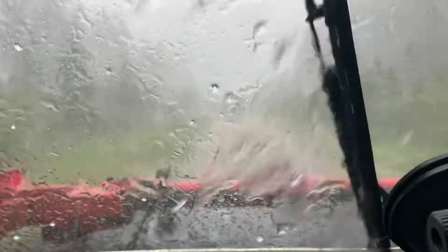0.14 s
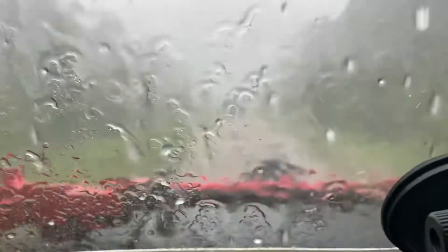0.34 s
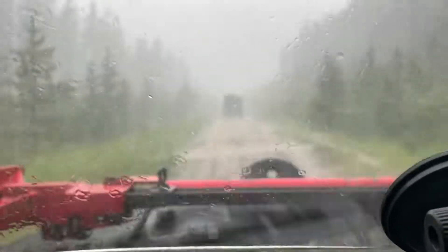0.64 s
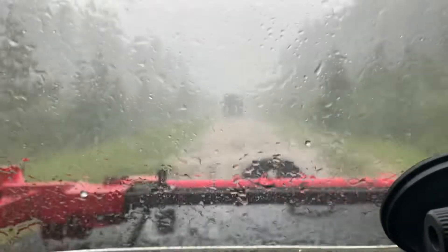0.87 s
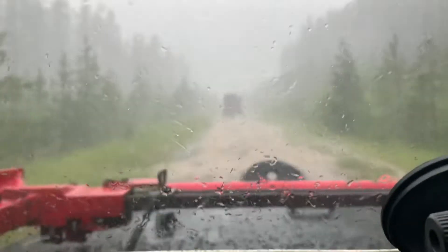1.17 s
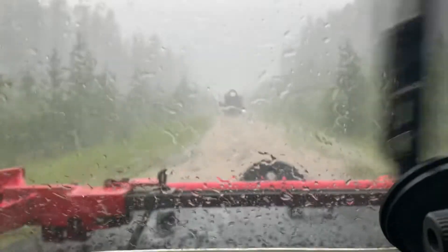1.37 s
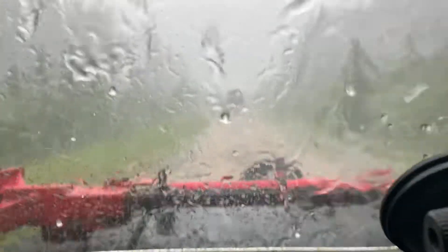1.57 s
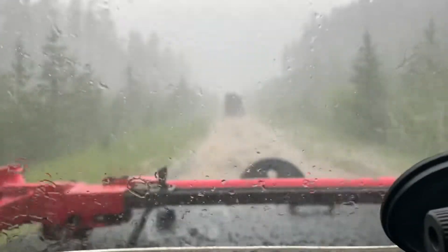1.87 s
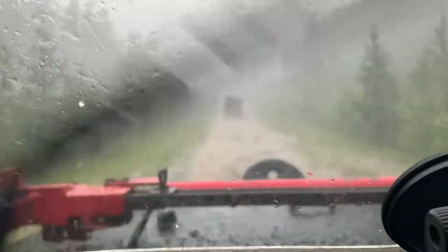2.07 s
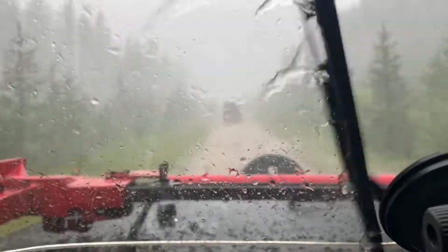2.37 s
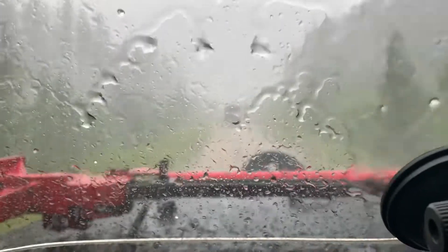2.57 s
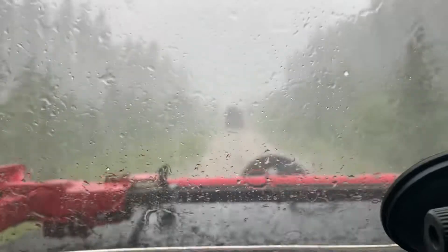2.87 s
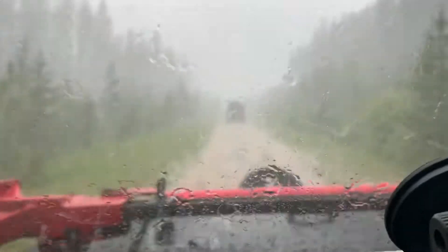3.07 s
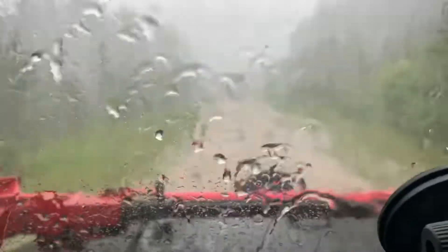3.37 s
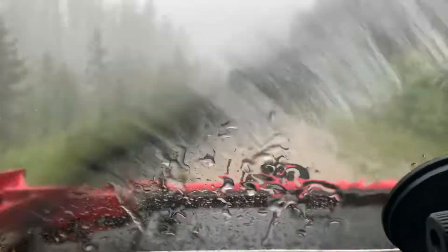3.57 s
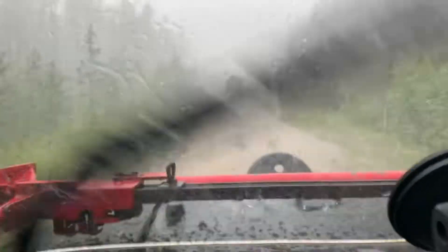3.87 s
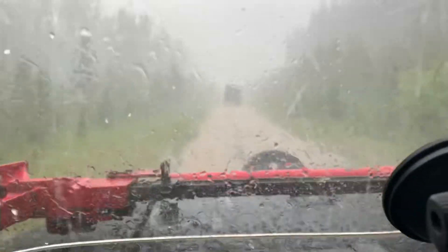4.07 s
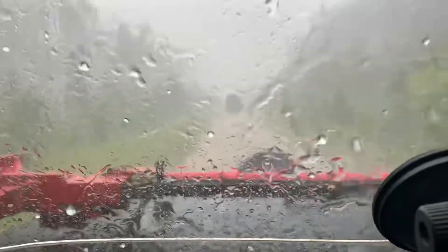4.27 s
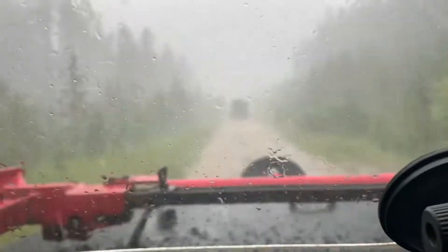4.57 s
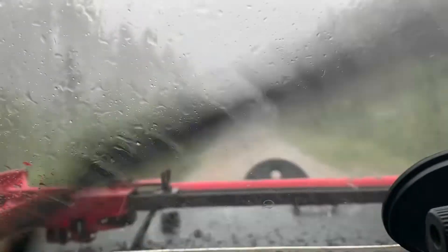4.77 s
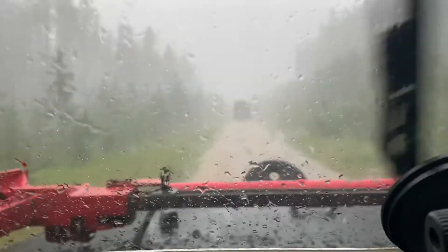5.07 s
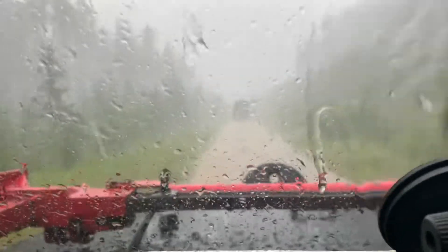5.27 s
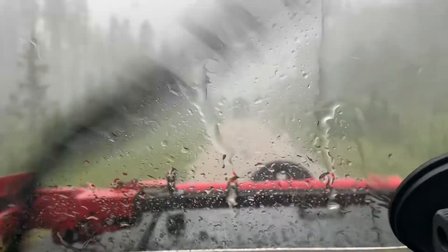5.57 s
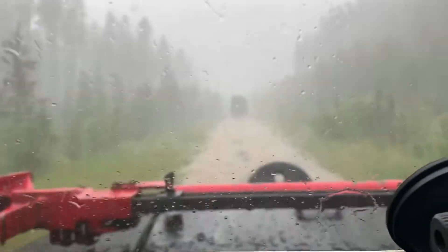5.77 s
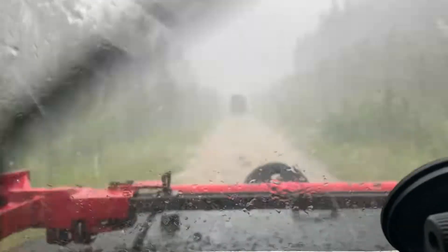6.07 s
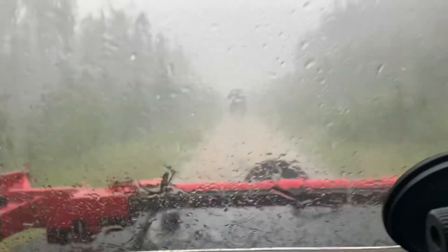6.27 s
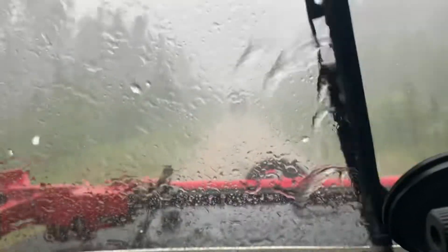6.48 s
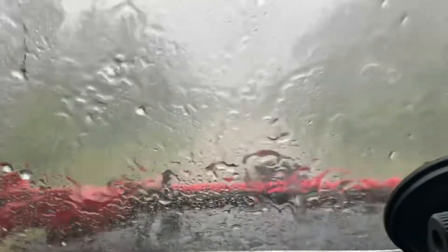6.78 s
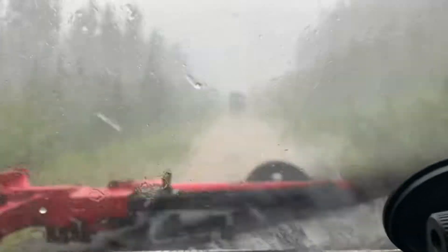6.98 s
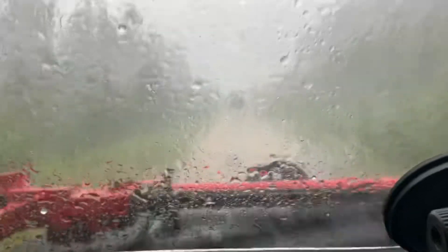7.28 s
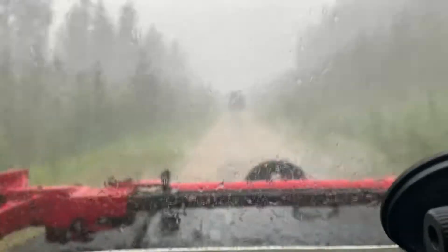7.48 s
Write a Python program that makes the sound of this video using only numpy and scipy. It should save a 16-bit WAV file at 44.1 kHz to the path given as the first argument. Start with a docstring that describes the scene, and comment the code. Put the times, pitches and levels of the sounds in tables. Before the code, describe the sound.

Heavy rain hits a moving vehicle throughout, heard from inside the cab close to the windshield. Dense, crisp patter and hissing spray swell and ease in sheets, with fat drops smacking the glass and a duller drumming on the metal roof. The rain surges at the start, around 1.5, 2.6 and 3.8 seconds, dips briefly near 3.3 and 5.2, and is strongest around 6.6 and 7.5. Slugs of water thud hollowly on the roof at the start, around 4 seconds and at the end. A wiper gives a hollow double knock at about 3.2 and 5.2 seconds. Underneath, a low engine drone wavers, rises in pitch from about 4 to 5.5 seconds and drops again at the very end. The rough dirt road adds a constant rumble and deep booming bumps, which come thicker and heavier from 6 seconds on.

```python
"""Heavy rain inside a vehicle on a dirt trail.

Sheets of drops surge against the windshield and drum on the roof, their impacts exciting the panels'
resonances. Fat single drops smack in between, and the wiper knocks. Underneath, the engine drones at
its firing rate and rough ground sets the air of the cab booming. The listener is a phone with two
microphone ports, close to the glass."""
import sys
import numpy as np
from scipy import signal
from scipy.fft import rfft, irfft, next_fast_len
from scipy.io import wavfile
from scipy.ndimage import uniform_filter1d

SR = 44100
rng = np.random.default_rng(int(sys.argv[2]) if len(sys.argv) > 2 else 0)


def transcribe(signal):
    """Save signal, clipped to [-1, 1], as a 16-bit WAV file at the path in sys.argv[1]."""
    frames = np.atleast_2d(signal).T
    limited = np.clip(frames, -1, 1)
    pcm = np.round(limited * 32767).astype(np.int16)
    wavfile.write(sys.argv[1], SR, pcm)


N = 336483
TIME = np.arange(N) / SR
MEDIUM_RAIN_DB, LOW_REVS_HZ = -30, 60  # reference rain level and firing rate

# The engine's speed. Each row: time in seconds, firing rate in Hz.
FIRING_RATE = [(0, 72.4), (.33, 75.7), (.58, 62.04), (1.2, 62.14), (1.55, 65.93), (2.02, 76.6), (2.3, 64),
               (2.9, 64.14), (3.4, 60.83), (3.9, 65.4), (4.3, 70.3), (4.7, 79.1), (5.05, 81), (5.42, 96.3),
               (6.2, 94), (6.75, 89.7), (7.3, 86.56), (7.63, 70.2)]
# Resonances of the windshield. Each row: centre in Hz, width in Hz, lift in dB.
GLASS_MODES = [(770, 110, 6.5), (1370, 150, 1.5), (1620, 120, 1.5), (2270, 110, 1.5), (2560, 260, 2.5),
               (3170, 150, 1.5), (3500, 230, 3), (4600, 300, 1.5)]


def undb(db):
    """Amplitude ratio of a level in decibels."""
    return 10 ** (np.asarray(db) / 20)


def unit(x):
    """Normalisation to an rms of 1."""
    return x / np.sqrt(np.mean(x ** 2))


def curves(table):
    """Linear interpolation of each column over the times in the first."""
    s, *columns = np.transpose(table)
    return [np.interp(TIME, s, column) for column in columns]


def wander(per_s):
    """Slow random modulation with a spread near 1."""
    steps = rng.standard_normal(int(TIME[-1] * per_s) + 2)
    return np.interp(TIME * per_s, np.arange(len(steps)), steps)


def add(out, s, sound):
    """Superposition of a sound starting at s seconds."""
    start = max(int(s * SR), 0)
    out[:, start:start + sound.shape[1]] += sound[:, :N - start]


def swells(rows, floor_db, steepness=1):
    """Power sum of swells and a floor, in dB; one rise or fall from its crest costs 10 * steepness dB."""
    power = undb(floor_db) ** 2
    t = TIME[::64]
    for crest_s, rise_s, fall_s, db in rows:
        away = np.maximum((crest_s - t) / rise_s, (t - crest_s) / fall_s)
        power = power + undb(db - 10 * steepness * away ** 1.71) ** 2  # nearly a bell curve
    return np.interp(TIME, t, 10 * np.log10(power))


def colour(x, outline, modes=()):
    """Minimum-phase filter of a spectral outline plus resonances; causality keeps attacks sharp."""
    size = 2048
    hz = np.fft.rfftfreq(size, 1 / SR)
    outline_hz, outline_db = np.transpose(outline)
    db = np.interp(np.log(hz + 1), np.log(outline_hz), outline_db)
    for centre, width, lift in modes:
        db = db + lift / (1 + (2 * (hz - centre) / width) ** 2)
    cepstrum = irfft(np.log(undb(db)))
    cepstrum[1:size // 2] *= 2
    cepstrum[size // 2 + 1:] = 0
    response = irfft(np.exp(rfft(cepstrum)))
    return signal.fftconvolve(x, response[None], axes=1)[:, :x.shape[1]]


def decay(splat_t60, ring_t60, ring_db):
    """Double exponential decay: a short splat, then the ring of panel and cab (t60 in seconds)."""
    t = np.arange(SR // 8) / SR
    splat = np.exp(-np.log(1000) * t / splat_t60)
    ring = undb(ring_db) * np.exp(-np.log(1000) * t / ring_t60)
    return np.hypot(splat, ring)


def impact(splat_t60, ring_t60, ring_db):
    """Broadband excitation by one blow: two channels of decaying noise."""
    fade = decay(splat_t60, ring_t60, ring_db)
    return fade * rng.standard_normal((2, len(fade)))


def shower(per_s, fade, spread_db, patchy_db, low_hz, high_hz, bands):
    """Shot noise of even mean power: random drops each excite a panel's bands in their own mix."""
    step = 8  # samples per envelope point
    size, rate = next_fast_len(N, True), per_s[::step]
    falls = rng.random(len(rate)) < rate * step / SR
    drop_db = spread_db * np.clip(rng.standard_normal(len(rate)), -2, 2)
    noise = rfft(rng.standard_normal((2, size)))
    band_of = np.searchsorted(np.geomspace(low_hz, high_hz, bands - 1), np.fft.rfftfreq(size, 1 / SR))
    out = 0
    for band in range(bands):
        band_db = drop_db + patchy_db * np.clip(rng.standard_normal(len(rate)), -2, 2)
        # overlapping splats add in power, and their fine detail is noise
        power = np.convolve(falls * undb(band_db) ** 2 / rate, fade[::step] ** 2)
        carrier = irfft(noise * (band_of == band), size)[:, :N]
        out = out + np.repeat(np.sqrt(power), step)[:N] * carrier
    return unit(out)


def engine():
    """Periodic firing gives a drone of three harmonics, which throbs and grows louder with the revs."""
    firing_hz, = curves(FIRING_RATE)
    phase = 2 * np.pi * np.cumsum(firing_hz * (1 + 0.01113 * wander(12))) / SR
    harmonics = np.sin(phase) + undb(-10.5) * np.sin(2 * phase) + undb(-13) * np.sin(3 * phase)
    throb = undb(3 * wander(11))
    level_db = -37 + 4 * np.log2(firing_hz / LOW_REVS_HZ)
    return unit(harmonics * throb) * undb(level_db)


def rough_ground():
    """Cavity resonance: rolling drives a rumble in the cab's air, and each bump adds a tonal boom."""
    # Bumps in the trail. Each row: crest in seconds, level in dB, boom in Hz, rise and fall in seconds.
    bumps = [(.45, -24, 53.6, .02), (.73, -25, 53.5, 0.058), (.86, -21, 52.4, 0.021),
             (1.245, -20, 54.5, .03), (2.0, -25, 62.5, 0.033), (2.261, -22, 50, 0.037),
             (2.63, -19.5, 48.9, .045), (2.99, -23, 50.3, 0.054), (3.42, -29, 51.57, 0.02),
             (3.86, -19.5, 40.3, 0.04), (4.35, -22, 47.8, .025), (5.05, -25, 56.3, 0.041),
             (5.29, -28, 51.87, 0.034), (5.44, -23, 49.7, .04), (5.97, -18.5, 52.2, 0.028),
             (6.2, -20, 56.6, 0.04), (6.322, -22, 54.8, .03), (6.45, -17, 54.2, .04),
             (6.62, -20, 61.4, 0.024), (6.79, -13.5, 50.2, 0.022), (6.92, -22, 42.9, 0.052),
             (7.14, -19, 50, 0.031), (7.24, -19.5, 55.85, 0.017), (7.32, -22, 60, 0.028),
             (7.46, -19, 57, 0.022), (7.529, -19, 55, 0.033)]
    # Spectrum of the cab's rumble. Each row: frequency in Hz, relative level in dB.
    cab_spectrum = [(12, -16.5), (25, -4), (38, 0.5), (50, -0.5), (64, 2.5), (85, -4.5), (120, -7.5),
                    (170, -18), (300, -20), (800, -29), (3000, -56)]
    # Air modes of the cab. Each row: centre in Hz, width in Hz, lift in dB.
    air_modes = [(46.1, 9.4, 5), (60.7, 5.1, 4.5), (111, 11, 2.5)]
    bump_db = swells([(s, length, length, db) for s, db, _, length in bumps], floor_db=-60)
    _, boom_hz, _ = curves(bumps)
    phase = 2 * np.pi * np.cumsum(boom_hz * (1 + 0.041 * wander(25))) / SR
    boom = unit(np.sin(phase)) * undb(bump_db)
    firing_hz, = curves(FIRING_RATE)
    roll_db = -29.5 + 3.5 * np.log2(firing_hz / LOW_REVS_HZ)
    rumble = colour(rng.standard_normal((2, N)), cab_spectrum, air_modes)
    # the close air modes beat quickly; the slow swells follow the ride alone
    rumble = rumble / np.sqrt(uniform_filter1d(rumble ** 2, size=SR // 5, axis=1))
    return rumble * np.hypot(undb(roll_db), undb(bump_db - 17.5)), boom


def body_panel(mode_hz=113.2, width_hz=9.5):
    """Forced vibration: the shaking of the ride wakes one low mode of the body now and then."""
    # Swells of the hum. Each row: crest, rise and fall in seconds, level in dB.
    hums = [(.2, 0.04, 0.07, -29), (2.8, 0.077, 0.19, -33.5), (3.85, 0.028, 0.24, -31),
            (4.19, 0.049, 0.093, -26), (4.42, 0.071, 0.068, -25.5), (5.33, 0.047, 0.051, -32),
            (6.0, 0.078, .2, -44)]
    resonator = signal.iirpeak(mode_hz, mode_hz / width_hz, fs=SR)
    ringing = signal.lfilter(*resonator, rng.standard_normal((2, N)))
    return unit(ringing) * undb(swells(hums, floor_db=-59))


def bonnet():
    """Steady shot noise from rain on the far bodywork, soft and round, coloured by the glass modes."""
    # Spectrum of the far patter. Each row: frequency in Hz, relative level in dB.
    spectrum = [(300, -10), (800, 0.5), (1400, 4), (2500, -2), (4000, -9), (7000, -32), (15500, -30)]
    tap = decay(splat_t60=.016, ring_t60=.08, ring_db=-4)
    patter = shower(np.full(N, 450.), tap, spread_db=4.5, patchy_db=4, low_hz=900, high_hz=4500, bands=6)
    return unit(colour(patter, spectrum, GLASS_MODES)) * undb(-49)


def wiper():
    """Structure-borne sound: the turning wiper knocks hollowly through the windshield."""
    # Knocks of the wiper. Each row: start in seconds, peak level in dB, ring in Hz.
    knocks = [(3.226, -16, 816), (3.284, -24, 400), (5.204, -14.5, 392), (5.261, -22.5, 563)]
    out = np.zeros((2, N))
    for s, peak_db, ring_hz in knocks:
        blow = impact(splat_t60=.04, ring_t60=.14, ring_db=-6)
        knock = colour(blow, [(80, 16), (260, 3.0), (800, 9.5), (2500, -45)], [(ring_hz, 130, 5)])
        add(out, s, knock * undb(peak_db) / np.abs(knock).max())
    return out


def rainfall(roof_lag_s=0.02):
    """Amplitude modulation by sheets of rain: spray keeps to the crests, the roof follows gently."""
    # Sheets of rain. Each row: crest, rise and fall in seconds, level of the drops in dB,
    # spray relative to the drops in dB, extra level on the roof in dB.
    sheets = [(.17, 0.74, 0.42, -24.5, -0.5, -0.5), (.57, 0.18, 0.19, -29, -3, -1),
              (1.091, 0.085, 0.36, -27.5, -4.5, 0), (1.181, 0.077, 0.076, -27.5, 2, 0),
              (1.478, 0.21, 0.2, -21.5, .5, 1.5), (1.749, 0.1, 0.41, -29, -4.5, -1.5),
              (2.24, 0.022, 0.095, -28.5, -5.5, 0), (2.631, 0.34, 0.5, -24.5, -1.5, 0),
              (3.4, 0.082, 0.32, -46.5, 5, 2), (3.82, 0.16, 0.51, -23.5, 0, 2.5),
              (4.031, 0.2, 0.14, -27, 2, -0.5), (4.571, 0.24, 0.041, -27.5, 1.5, 0.5),
              (4.68, 0.14, 0.2, -28, -0.5, 1.5), (5.441, 0.063, 0.18, -33.5, -1.5, 3.5),
              (5.819, 0.19, 0.4, -26, 0.5, 1.5), (6.14, 0.06, 0.23, -27.5, 0.5, 2),
              (6.4, 0.087, 0.12, -36.5, -16, 0.5), (6.535, 0.053, 0.3, -21.5, -7, 0.5),
              (6.771, 0.15, 0.23, -20.5, -4, 0), (7.075, 0.087, 0.35, -31, -8, -3),
              (7.555, 0.062, 0.18, -17.5, -2.5, 1)]
    crest_s, rise_s, fall_s, db, spray_share_db, roof_extra_db = np.transpose(sheets)
    drops_db = swells(zip(crest_s, rise_s, fall_s, db), floor_db=-47)
    spray_db = swells(zip(crest_s, rise_s, fall_s, db + spray_share_db), floor_db=-52, steepness=1.43)
    late_surge_db = np.interp(TIME - roof_lag_s, TIME, drops_db) - MEDIUM_RAIN_DB
    roof_db = -32 + 0.74 * late_surge_db + np.interp(TIME, crest_s, roof_extra_db)
    return drops_db, spray_db, roof_db


def roof(level_db):
    """Plate vibration: rain drums on the sheet metal, duller and longer than on glass."""
    # Spectrum of the drumming. Each row: frequency in Hz, relative level in dB.
    spectrum = [(50, -23), (120, 7), (170, -0.5), (215, -2), (260, 1), (390, 0.5), (480, -4.5), (620, -10),
                (1000, -9), (3000, -43)]
    # Resonances of the roof. Each row: centre in Hz, width in Hz, lift in dB.
    modes = [(185, 9.8, 5.5), (256.4, 14.5, 2.5), (397, 180, 0.5), (550, 31, 7.5)]
    tap = decay(splat_t60=0.022, ring_t60=0.13, ring_db=8)
    drum = shower(np.full(N, 500.), tap, spread_db=2.5, patchy_db=6.5, low_hz=176, high_hz=469, bands=4)
    return unit(colour(drum, spectrum, modes)) * undb(level_db)


def roof_thuds():
    """Impulsive loading: slugs of gathered water excite a low, hollow resonance of the roof."""
    # Slugs of water. Each row: start in seconds, peak level in dB, ring in Hz.
    slugs = [(.043, -15, 231), (.21, -14, 400), (2.33, -20, 350), (3.955, -12.5, 290), (4.199, -18, 190),
             (4.356, -16.5, 304), (7.563, -14, 340)]
    out = np.zeros((2, N))
    for s, peak_db, ring_hz in slugs:
        blow = impact(splat_t60=.04, ring_t60=.14, ring_db=-3)
        thud = colour(blow, [(60, -20), (170, 0), (450, 0), (2000, -35)], [(ring_hz, 110, 10)])
        add(out, s, thud * undb(peak_db) / np.abs(thud).max())
    return out


def pitch_hz(draw, low_hz=500, high_hz=5200):
    """Power-law mapping of a draw from 0 to 1 onto frequency; low pitches are more common."""
    return low_hz + (high_hz - low_hz) * draw ** 1.5


def pings(drops_db, per_s=130, tones=3, t60=.035, spread_db=2.5):
    """Damped sinusoids: faint, short pings, three tones at once, scattered and louder in the surges."""
    out = np.zeros((2, N))
    t = np.arange(SR // 20) / SR
    fade = np.exp(-np.log(1000) * t / t60)
    for when, strength, *draws in rng.random((int(per_s * N / SR), 2 + 3 * tones)):
        draws = np.reshape(draws, (3, tones, 1))
        tone_hz, channel_phases = pitch_hz(draws[0]), draws[1:]
        ping = np.sin(2 * np.pi * (tone_hz * t + channel_phases)).sum(axis=1)
        level_db = drops_db[int(when * N)] - 9.5 + spread_db * np.sqrt(12) * (strength - .5)
        add(out, when * N / SR, ping * fade * undb(level_db))
    return out


def fat_drop(smack_db, splash_db, t60, ring_hz, lift_db):
    """Impact of one large drop: a smack that excites the struck spot's resonance, and a bright splash."""
    # Spectra of the smack and the splash. Each row: frequency in Hz, relative level in dB.
    smack_spectrum = [(60, -34), (250, -15), (700, -5), (1500, 0), (2600, 1), (5000, 0), (7000, -10),
                      (15500, -28)]
    splash_spectrum = [(2000, -28), (5000, -8), (7000, 0), (11500, 1), (13500, -2), (15500, -3),
                       (17000, -30)]
    out, attack = 0, int(.0043 * SR)  # the levels apply to the attack
    struck_modes = GLASS_MODES + [(ring_hz, ring_hz / 5, lift_db)]  # the spot has a Q of 5
    for spectrum, modes, db in (smack_spectrum, struck_modes, smack_db), (splash_spectrum, (), splash_db):
        sound = colour(impact(splat_t60=.011, ring_t60=t60, ring_db=-5.5), spectrum, modes)
        out = out + sound * undb(db) / sound[:, :attack].std()
    return out


def fat_drops(drops_db, spray_db, per_s=50, range_db=14):
    """Discrete impacts: the fattest drops stand alone; lesser ones fall at random and follow the surges."""
    # The fattest drops. Each row: start in seconds, smack level in dB, splash level in dB,
    # t60 in seconds, ring of the struck spot in Hz, lift of that ring in dB.
    fattest = [(.319, -28, -21, .03, 800, 10), (.626, -35, -23, .03, 560, 10),
               (.694, -27, -38, .03, 1810, 10), (.847, -38, -34, .04, 1500, 4),
               (1.004, -30, -25, .025, 1230, 11), (1.037, -30, -23.5, .05, 4290, 7),
               (1.572, -34, -18, .03, 1640, 6), (1.741, -22, -24, .06, 1350, 6),
               (1.874, -33, -20.5, .06, 2400, 8), (2.012, -36, -29, .04, 3500, 5),
               (2.042, -33, -25, .04, 4500, 5), (2.108, -31, -25, .025, 1770, 8),
               (2.166, -30, -30, .09, 3600, 13), (2.223, -26, -28, .05, 4450, 5),
               (2.255, -25, -24, .08, 2300, 6), (2.268, -28, -27, .06, 2500, 7),
               (2.33, -32, -23.5, .06, 900, 10), (3.185, -31, -27, .035, 580, 8),
               (3.348, -41, -33.5, .09, 2500, 4), (3.471, -34, -26, .04, 1400, 5),
               (3.511, -33, -25, .06, 580, 6), (3.576, -21.5, -25.5, .045, 2710, 4),
               (3.632, -29, -26, .04, 1920, 6), (3.64, -24, -30, .06, 1570, 6),
               (3.691, -30, -26, .08, 2500, 4), (3.712, -25, -26, .08, 3400, 4),
               (4.279, -32, -22.5, .06, 2500, 4), (4.498, -26, -25, .05, 3470, 7),
               (4.515, -29, -21, .025, 2300, 5), (4.537, -21, -30, .07, 4300, 6),
               (4.612, -23.5, -23, .04, 2300, 7), (4.689, -27, -20.5, .08, 800, 14),
               (4.779, -26.5, -20.5, .03, 3720, 9), (4.992, -35, -34, .08, 1000, 10),
               (5.026, -35, -44, .08, 2480, 8), (5.261, -29.5, -36, .07, 2300, 8),
               (5.348, -35, -34, .07, 710, 12), (5.389, -30.5, -37, .06, 2150, 11),
               (5.431, -35, -26.5, .04, 3800, 6), (5.444, -32, -27, .07, 2500, 5),
               (5.553, -29, -21.5, .02, 750, 14), (5.58, -30, -28, .04, 3300, 6),
               (5.64, -26.5, -35, .06, 3600, 12), (5.963, -22.5, -18, .035, 1230, 5),
               (6.03, -31, -20.5, .07, 840, 13), (6.114, -23, -24, .04, 5400, 6),
               (6.445, -30, -27, .025, 800, 10), (6.453, -30, -25.5, .03, 2500, 4),
               (6.464, -25, -28, .045, 1500, 4), (6.502, -24, -16, .04, 3450, 6),
               (7.023, -26, -19.5, .03, 1920, 6), (7.08, -29, -30, .07, 2010, 10),
               (7.12, -31, -34, .08, 2010, 10), (7.204, -27.5, -39, .06, 3600, 10),
               (7.302, -28, -25, .06, 1700, 8), (7.439, -32.5, -30, .04, 4500, 6),
               (7.467, -18.5, -23.5, .04, 5040, 10), (7.563, -17, -20, .06, 2540, 10)]
    out = np.zeros((2, N))
    for s, *drop in fattest:
        add(out, s, fat_drop(*drop))
    for when, size, wetness, spot in rng.random((int(per_s * N / SR), 4)):
        i = int(when * N)
        weaker_db = 0.5 + range_db * np.sqrt(size)
        smack_db = drops_db[i] - weaker_db
        splash_db = spray_db[i] - weaker_db + 6 * wetness
        add(out, i / SR, fat_drop(smack_db, splash_db, t60=0.08, ring_hz=pitch_hz(spot), lift_db=11))
    return out


def windshield(drops_db, spray_db):
    """Shot noise on glass: a surge brings more and larger drops, and taps thicken into a hiss of spray."""
    taps_per_s = 1000 * undb(.55 * (drops_db - MEDIUM_RAIN_DB))
    tap = decay(splat_t60=.005, ring_t60=.09, ring_db=4)
    patter = shower(taps_per_s, tap, spread_db=6, patchy_db=6.5, low_hz=800, high_hz=7000, bands=16)
    # fine spray comes in short bursts, too light to set the glass ringing
    bursts_per_s = 600 * undb(spray_db - MEDIUM_RAIN_DB)
    burst = decay(splat_t60=0.005, ring_t60=0.04, ring_db=-6)
    spray = shower(bursts_per_s, burst, spread_db=6, patchy_db=4.5, low_hz=8040, high_hz=15100, bands=4)
    # Spectra of taps on glass and of fine spray. Each row: frequency in Hz, relative level in dB.
    glass_spectrum = [(250, -9), (600, -0.5), (950, 2), (1200, 0.5), (1500, 2.5), (2600, -0.5), (3000, -1),
                      (4300, -3), (5800, -5), (7600, -16.5), (10000, -3), (15500, -14)]
    spray_spectrum = [(500, -36), (3000, -15), (6000, -4), (7600, -.5), (9400, 0), (12400, -2), (13400, -8),
                      (15500, -7.5)]
    patter = unit(colour(patter, glass_spectrum, GLASS_MODES)) * undb(drops_db - 0.5)
    return patter + unit(colour(spray, spray_spectrum)) * undb(spray_db)


def ports(pair):
    """Coherence: bass and direct treble reach both ports alike but for a lag; the cab scrambles the mids."""
    # The field at the two ports. Each row: frequency in Hz, coherence from 0 to 1,
    # phase lead of the left in radians, left minus right level in dB.
    field = [(50, 0.93, 0, -3), (130, 0.88, -.1, -1), (300, 0.66, -.3, -2), (482, 0.05, -.7, -1.5),
             (620, 0.43, -3.1, 1.5), (1150, 0.36, -3.1, -0.5), (2100, 0.2, -1.4, 0.3), (2550, 0.33, .5, 0),
             (3000, 0.15, 2.9, -.5), (4500, 0.25, 6.7, -1.5), (5400, 0.2, 9.3, -3), (6400, 0.45, 12.3, -2),
             (7400, 0.65, 10.9, -.5), (8200, .95, 9.6, 0), (9000, .92, 9.1, 0), (10400, .95, 6.5, 0),
             (11600, .92, 5.9, 0), (12900, .95, 3.5, 0), (14100, .95, 2.8, 0), (15400, .88, 0, 0)]
    size = next_fast_len(N)
    common, independent = rfft(pair, size)
    hz = np.fft.rfftfreq(size, 1 / SR)
    field_hz, *columns = np.transpose(field)
    coherence, lead, pan_db = (np.interp(hz, field_hz, column) for column in columns)
    left = (coherence * common + np.sqrt(1 - coherence ** 2) * independent) * np.exp(1j * lead)
    return irfft(np.array([left * undb(pan_db / 2), common * undb(-pan_db / 2)]), size)[:, :N]


def scene():
    """Superposition at the dashboard of rain on glass, roof and bonnet, the wiper and the ride."""
    drops_db, spray_db, roof_db = rainfall()
    near_rain = windshield(drops_db, spray_db) + fat_drops(drops_db, spray_db) + pings(drops_db)
    rain = near_rain + roof(roof_db) + roof_thuds() + bonnet()
    drone = engine()
    rumble, boom = rough_ground()
    low_tones = (boom + drone) * undb([[-1.4], [1.4]])  # a little to the right
    return ports(rain + wiper() + rumble + body_panel()) + low_tones


def record(dry):
    """Soft saturation and band limiting: the phone rounds the loudest peaks and cuts the top."""
    low_pass = signal.ellip(12, .1, 90, 15800, fs=SR, output="sos")
    return signal.sosfilt(low_pass, np.tanh(dry))


dry = scene()
out = record(dry)
transcribe(out)
```